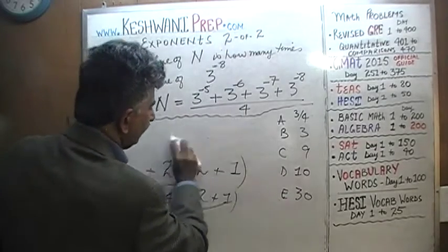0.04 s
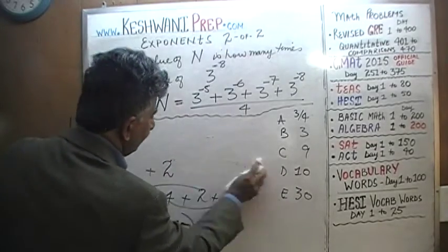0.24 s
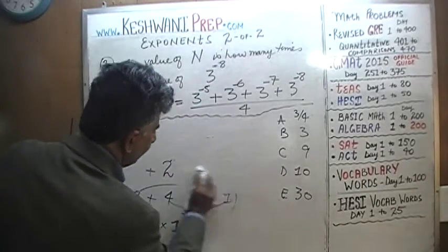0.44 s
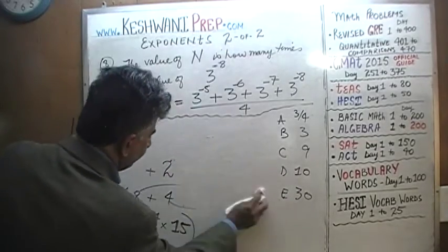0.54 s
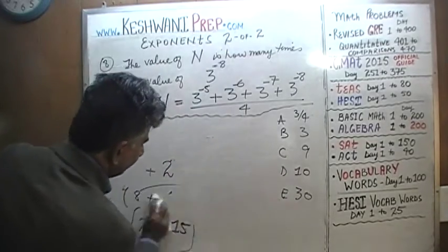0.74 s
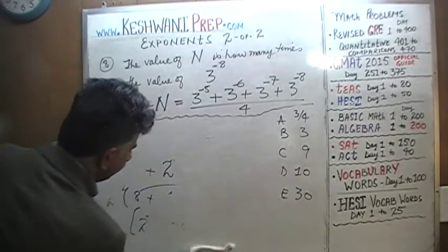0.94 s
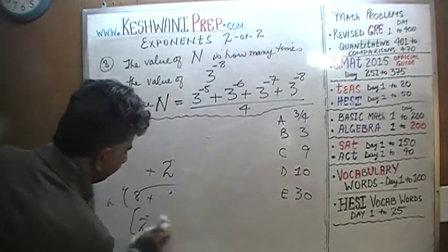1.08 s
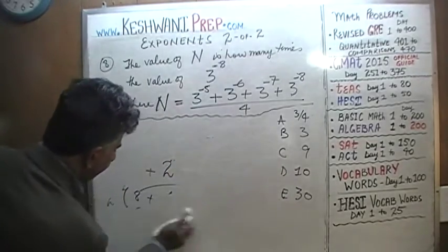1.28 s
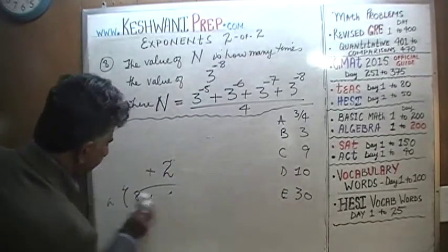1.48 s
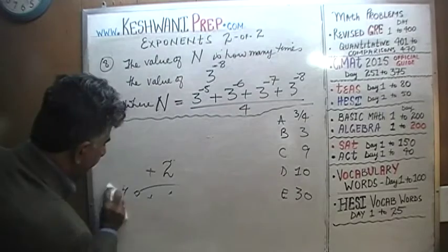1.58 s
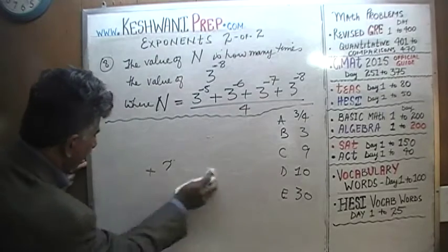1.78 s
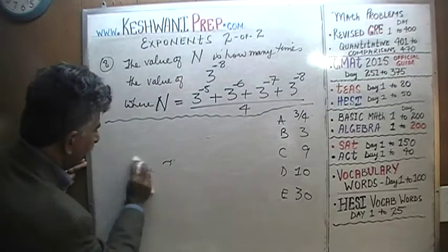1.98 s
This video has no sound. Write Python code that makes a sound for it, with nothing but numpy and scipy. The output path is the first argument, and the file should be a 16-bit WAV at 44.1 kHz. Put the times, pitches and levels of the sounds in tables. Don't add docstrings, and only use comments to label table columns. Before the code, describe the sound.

Brisk whiteboard erasing, soft scratchy swishes with dull board thuds over a low room hum

```python
import sys
import numpy as np
from scipy import signal
from scipy.io import wavfile
from scipy.ndimage import uniform_filter1d

SR = 44100
rng = np.random.default_rng(int(sys.argv[2]) if len(sys.argv) > 2 else 0)


def to_wav(sig):
    pcm = np.clip(np.atleast_2d(sig), -1, 1) * 32767
    pcm = np.round(pcm).astype(np.int16)
    wavfile.write(sys.argv[1], SR, pcm.T)


def gain_from_decibels(decibels):
    exponent = np.asarray(decibels, float) / 20
    return 10 ** exponent


N = 88993

# (frequency [Hz], left minus right [dB])
LEAN = [(60, 1.7), (400, 1.3), (4000, 1.9), (8000, 3.2), (13000, 5.2)]


def rms_one(x):
    return x / np.sqrt(np.mean(x ** 2) + 1e-20)


def at_hz(points, hz):
    points = np.array(points)
    return np.interp(np.log(hz), np.log(points[:, 0]), points[:, 1])


def band_pass(x, low_hz, high_hz):
    return signal.sosfilt(signal.butter(2, [low_hz, high_hz], "band", fs=SR, output="sos"), x)


def drift(rate_hz):
    stride = 40
    r = np.exp(-2 * np.pi * rate_hz * stride / SR)
    chance = rng.standard_normal(N // stride + 2002)
    slow = rms_one(signal.lfilter([1], [1, -2 * r, r * r], chance)[2000:])
    return np.interp(np.arange(N) / stride, np.arange(len(slow)), slow)


def ring(clicks, hz, t60):
    r, w = gain_from_decibels(-60 / (t60 * SR)), 2 * np.pi * hz / SR
    return signal.lfilter([0, np.sin(w)], [1, -2 * r * np.cos(w), r * r], clicks + 1e-18)


def spread(mid, side, alike, lean_db):
    alike = np.clip(alike, 0, 1)
    sign = np.array([[1.], [-1.]])
    pair = np.sqrt(1 + alike) * mid + np.sqrt(1 - alike) * side * sign
    return pair * gain_from_decibels(sign * lean_db / 2)


def coloured(white, spectrum, likeness, patchy_db, low_hz, tilt_db=0):
    out, lead = 0, 9000
    edges = low_hz * 2 ** np.arange(0, np.log2(20500 / low_hz), .5)
    for k, (low, high) in enumerate(zip(edges, edges[1:])):
        source = np.tile(white[k % 2], 2)[:, N - lead:]
        mid, side = band_pass(source, low, high)[:, lead:]
        hz = np.sqrt(low * high)
        gain = gain_from_decibels(at_hz(spectrum, hz) + patchy_db * drift(10.5) + tilt_db * np.log2(hz / 7000))
        out = out + gain * spread(mid, side, at_hz(likeness, hz), at_hz(LEAN, hz))
    return rms_one(out)


def hand_push():
    # (start [s], level [dB], moment of top speed [0-1], brightness [dB per octave],
    # speed left at the turn [0-1])
    strokes = [(-.1, -54, 0.74, -2.5, .2), (.045, -52, 0.48, -0.5, 0.3), (.24, -51.5, .5, 0, 0.28),
               (.41, -50.5, 0.3, 0.5, 0.2), (0.594, -49, 0.42, 2, 0.04), (.78, -50.5, 0.38, 2, 0.32),
               (.965, -49, 0.79, 1.5, 0.32), (1.164, -49, 0.28, 0.5, 0.11), (1.37, -49.5, .65, 2, 0.16),
               (1.567, -49, 0.45, 1, 0.35), (1.79, -51, 0.78, 1, 0.22), (1.952, -47, 0.8, -0.5, 0.04)]
    last_turn_s, speed_power, drag_s, pressure_wobble_db = 2.15, 0.74, 0.009, .3
    start, db, top, bright, slow = np.transpose(strokes)
    end, t = np.append(start[1:], last_turn_s), np.arange(N) / SR
    k = np.searchsorted(start, t, side="right") - 1
    u = (t - start[k]) / (end - start)[k]
    top = np.clip(top[k], .1, .9)
    speed = np.sin(np.pi / 2 * np.where(u < top, u / top, (1 - u) / (1 - top)))
    slow = np.clip(np.where(u < top, slow[k], np.append(slow[1:], 0)[k]), 0, .9)
    speed = slow + (1 - slow) * speed
    push = gain_from_decibels(db[k] + pressure_wobble_db * drift(6.7)) * speed ** speed_power
    lag = np.exp(-1 / (drag_s * SR))
    push = signal.lfilter([1 - lag], [1, -lag], push, zi=[lag * push[0]])[0]
    return push, uniform_filter1d(bright[k], size=1500)


def felt():
    # (frequency [Hz], density [dB per Hz])
    felt_spectrum = [(900, -3.5), (2200, -4.5), (3500, -2.5), (5300, -6.5), (7000, -0.5), (9200, -12.5),
                     (11500, -14.5), (15500, -14)]
    # (frequency [Hz], left-right likeness [0-1])
    felt_likeness = [(1000, .8), (5200, .97), (7500, .55), (14000, .45)]
    grains_per_s, grain_spread_db, grain_share = 5000, 2.5, 0.31
    push, tilt = hand_push()
    shape = (2, 2, N)
    sizes = gain_from_decibels(grain_spread_db * np.minimum(rng.exponential(1, shape), 5))
    sizes = sizes * rng.choice([-1, 1], shape)
    grains = rms_one(sizes * (rng.random(shape) < grains_per_s / SR))
    white = grain_share * grains + (1 - grain_share) * rng.standard_normal(shape)
    return push * coloured(white, felt_spectrum, felt_likeness, patchy_db=1.5, low_hz=776, tilt_db=tilt)


def panel():
    # (time [s], boom frequency [Hz], boom level [dB], frame level [dB])
    thuds = [(.015, 62, -50, -52), (.125, 120, -50, -49), (.145, 60, -52, -55), (.185, 118, -52, -62),
             (.32, 70, -54, -52), (.59, 60, -58, -55), (.655, 100, -56, -58), (.985, 95, -53, -62),
             (1.03, 88, -47, -60), (1.16, 100, -47, -58), (1.23, 95, -46, -62), (1.38, 125, -46, -46),
             (1.405, 52, -46, -54), (1.43, 160, -52, -49), (1.455, 60, -46, -54), (1.475, 140, -50, -54),
             (1.495, 100, -56, -47), (1.585, 60, -53, -60), (1.79, 115, -51, -54), (1.83, 50, -50, -49),
             (1.88, 135, -46, -48), (1.915, 120, -54, -46), (1.945, 115, -49, -52), (1.985, 110, -51, -58)]
    # (frequency [Hz], level [dB], decay T60 [s])
    modes = [(159, -7.5, 0.086), (192, -21, 0.36), (256.4, -3, 0.22), (271.5, -8, 0.12),
             (314.5, -8.5, 0.12), (375, -5, 0.084), (533, -9, 0.13)]
    thud_gain_db, thud_spread_db, thud_soft_hz = 4.5, 0.5, 417
    boom_gain_db, boom_t60_s, boom_rise_s = 12, .12, .011
    rumble_db, rumble_t60_s = -5, 0.28
    rows, out, t = np.array(thuds), np.zeros(N), np.arange(N) / SR
    chance = rng.standard_normal((len(rows), len(modes), 2))
    for j, (hz, db, t60) in enumerate(modes):
        sign = np.sign(chance[:, j, 0])
        level = rows[:, 3] + db + thud_gain_db + thud_spread_db * chance[:, j, 1]
        pushes = np.zeros(N)
        pushes[(rows[:, 0] * SR).astype(int)] = sign * gain_from_decibels(level)
        out += ring(pushes, hz, t60)
    out = signal.sosfilt(signal.butter(2, thud_soft_hz, fs=SR, output="sos"), out)
    rumble = rms_one(band_pass(rng.standard_normal(N), 60, 407))
    for s, hz, db, frame_db in rows:
        age = np.maximum(t - s, 0)
        rise = 1 - np.exp(-age / boom_rise_s)
        out += gain_from_decibels(frame_db + rumble_db - 60 * age / rumble_t60_s) * rise * rumble
        boom = np.sin(2 * np.pi * hz * age)
        out += gain_from_decibels(db + boom_gain_db - 60 * age / boom_t60_s) * rise ** 2 * boom
    return out


def ticks():
    # (time [s], peak level [dB], ring frequency [Hz])
    slips = [
        (.1553, -37, 8600),
        (.1554, -38, 12800),
        (.1584, -35, 7200),
        (.1612, -39, 8500),
        (.1627, -40, 8000),
        (1.6965, -39, 12000),
        (1.6998, -38, 8000),
        (1.7035, -40, 7500),
    ]
    ring_t60_s, tail_db, tail_s = .0018, -22, .03
    out, t = np.zeros(N), np.arange(N) / SR
    hiss = rms_one(band_pass(rng.standard_normal(N), 6000, 10500))
    for s, db, hz in slips:
        click = np.zeros(N)
        click[int(s * SR)] = gain_from_decibels(db)
        tail = (t > s) * gain_from_decibels(db + tail_db - 60 * np.abs(t - s) / tail_s)
        out += ring(click, hz, ring_t60_s) + hiss * tail
    return band_pass(out, 5500, 13500)


def room(x):
    t60_s, wall_cut_hz = 0.53, 3300
    out, dull = np.zeros((2, N)), np.exp(-2 * np.pi * wall_cut_hz / SR)
    for k, lag in enumerate((rng.uniform(.012, .035, 12) * SR).astype(int)):
        loop, gain, state = x.copy(), gain_from_decibels(-60 * lag / SR / t60_s), [0.]
        for i in range(lag, N, lag):
            back, state = signal.lfilter([gain * (1 - dull)], [1, -dull], loop[i - lag:i], zi=state)
            loop[i:i + lag] += back[:N - i]
        out[k % 2] += (loop - x) * (-1) ** (k // 2)
    return out


def air():
    # (frequency [Hz], density [dB per Hz])
    air_spectrum = [(25, -11), (70, -2), (190, -3), (450, -3.5), (900, 1), (2100, -7.5), (3000, -13.5),
                    (6000, -21.5), (15500, -38)]
    # (frequency [Hz], left-right likeness [0-1])
    air_likeness = [(30, 1), (70, 0.69), (150, 0.15), (350, 0.15), (1200, 0.93), (4000, 0.53), (12000, 1)]
    # (frequency [Hz], width [Hz], level [dB])
    duct = [(122.6, 15, -68), (255.3, 44, -65.5), (347, 8.3, -72.5), (548, 48, -64.5), (671, 36, -69),
            (910, 64, -65), (1100, 6.7, -71.5), (1300, 240, -65.5), (2024, 350, -66.5)]
    air_db, duct_likeness = -48.5, .6
    white = rng.standard_normal((2, 2, N))
    out = gain_from_decibels(air_db) * coloured(white, air_spectrum, air_likeness, patchy_db=.4, low_hz=18.21)
    for hz, width_hz, db in duct:
        draught = rng.standard_normal((2, N + 9000))
        mid, side = rms_one(ring(draught, hz, 3.7 / width_hz)[:, 9000:])
        out = out + gain_from_decibels(db) * spread(mid, side, duct_likeness, at_hz(LEAN, hz))
    return out


def scene():
    tick_lean_db, thud_lean_db, thud_echo_db, room_db = 4, 1.6, -16, -15
    half = np.array([[.5], [-.5]])
    rub, thud, grit = felt(), panel(), ticks()
    near = rub + grit * gain_from_decibels(half * tick_lean_db) + thud * gain_from_decibels(half * thud_lean_db)
    echo = room(rub.mean(axis=0) + grit + gain_from_decibels(thud_echo_db) * thud)
    return near + gain_from_decibels(room_db) * echo + air()


def top_cut(x):
    return signal.sosfilt(signal.butter(12, 15710, fs=SR, output="sos"), x)


def record(dry):
    peak_hz, peak_width_hz, peak_db, low_cut_hz, top_hz = 9870, 1980, 3.5, 10, 10900
    r, w = np.exp(-np.pi * peak_width_hz / SR), 2 * np.pi * peak_hz / SR
    zeros = np.array([1, 0, -1]) * (1 - r * r) / 2
    peak = signal.lfilter(zeros, [1, -2 * r * np.cos(w), r * r], dry)
    finished = band_pass(dry + gain_from_decibels(peak_db) * peak, low_cut_hz, top_hz)
    return top_cut(finished)


dry = scene()
out = record(dry)
to_wav(out)
```